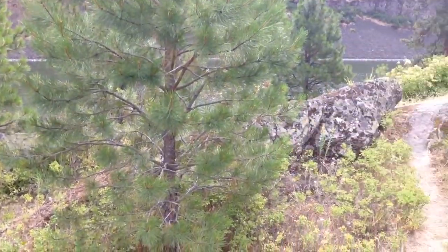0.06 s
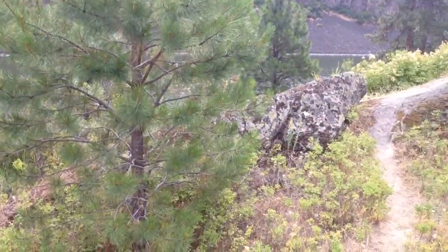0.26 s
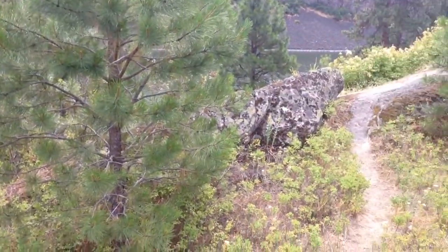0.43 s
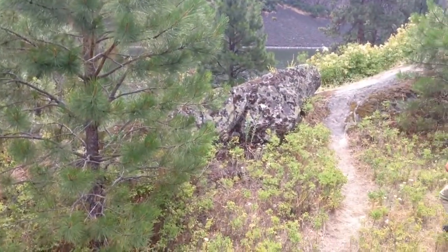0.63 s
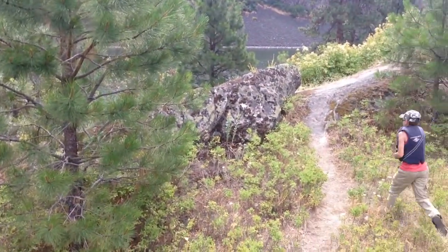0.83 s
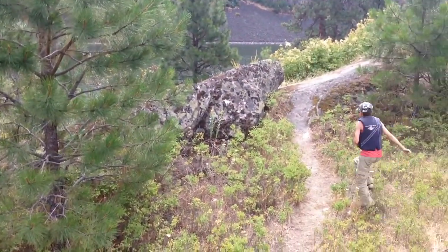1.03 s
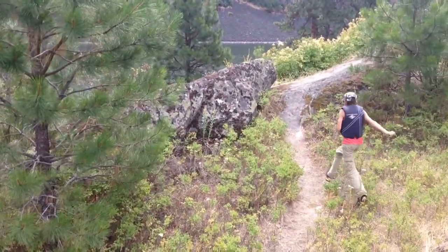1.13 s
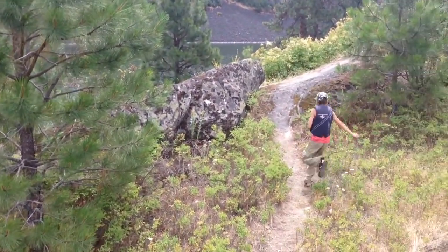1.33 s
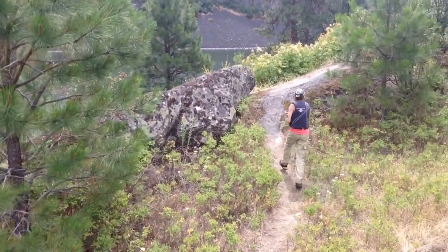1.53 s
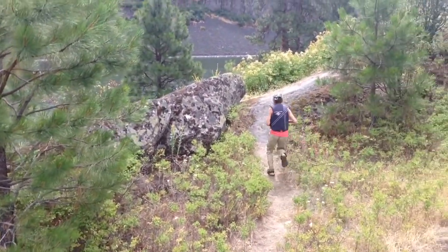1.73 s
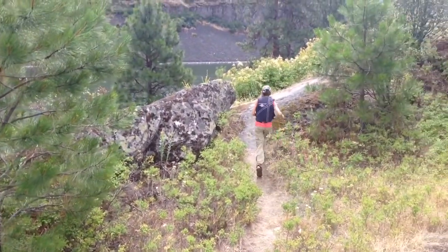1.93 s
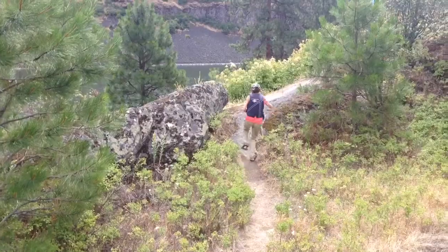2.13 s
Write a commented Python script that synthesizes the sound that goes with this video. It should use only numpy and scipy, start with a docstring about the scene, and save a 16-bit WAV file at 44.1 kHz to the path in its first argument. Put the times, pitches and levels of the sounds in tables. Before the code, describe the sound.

Running footsteps crunch on grit and move away through dry brush. For the first 0.7 seconds, louder wind rumbles and thuds on the microphone, then gradually eases. Stems swish past the legs and twigs and stones click underfoot, with the sharpest click at about 1.3 seconds. From there heels thump softly on a dirt trail, landing again near 1.7 and 2 seconds over the faint hiss of the woods.

```python
"""A wooded hillside, one microphone, someone running away from it downhill.
At first the runner is close: shoes crunch on grit, dry stems snap and swish past the legs,
and wind rumbles and thuds on the microphone. Twigs and stones click underfoot as the wind eases.
From about 1.3 s heels thump on a dirt trail, farther off. The wind dies away, and the last
steps land over the faint hiss of the woods."""
import sys
import numpy as np
from scipy.fft import rfft, irfft, next_fast_len
from scipy.io import wavfile
from scipy.ndimage import uniform_filter1d

SR = 44100
rng = np.random.default_rng(int(sys.argv[2]) if len(sys.argv) > 2 else 0)


def persist_wave(psi):
    """Save psi, clipped to +-1, as 16-bit WAV."""
    counts = np.round(np.clip(psi, -1, 1) * 32767).astype(np.int16)
    wavfile.write(sys.argv[1], SR, np.atleast_2d(counts).T)


N = 95961

# hiss of the woods all around: frequency_hz, level_db
WOODS_SPECTRUM = [(70, -2.5), (300, -1.5), (480, -4.5), (900, -8), (1200, -11.5), (1700, -8.5),
                  (3000, -12.5), (4500, -10), (11500, -16), (15000, -16.5)]
# wind rumble at the microphone: frequency_hz, level_db
WIND_SPECTRUM = [(20, -13), (30, -15), (48, 2), (64, 6.5), (165, 4), (300, -8.5), (560, -15)]
# gusts across the microphone: centre_s, level_db, half_length_s, upper_edge_hz
WIND_GUSTS = [(0.035, -31, 0.02, 530), (0.114, -30, 0.023, 554), (0.259, -37, 0.061, 240),
              (0.424, -33.5, 0.056, 453), (0.534, -37.5, 0.13, 280), (0.74, -44.5, 0.085, 145),
              (1.08, -48.5, 0.071, 102), (1.303, -48, 0.105, 185), (1.501, -48.5, 0.029, 236),
              (1.61, -57, 0.066, 113)]
# eddies striking the microphone: centre_s, level_db, pitch_hz, half_length_s
WIND_THUDS = [(0.126, -35.5, 506, 0.0025), (0.298, -26, 245, 0.00094), (.373, -23, 166, 0.0016),
              (0.404, -25, 184, 0.0016), (.452, -23, 171.5, 0.0059), (0.516, -20.5, 174, 0.0013),
              (0.559, -31.5, 303, 0.00092), (0.604, -33, 250, 0.0025), (0.649, -32, 230, 0.0013),
              (.735, -38, 183, 0.0061), (1.072, -33, 76.4, 0.0086), (1.142, -33.5, 93, 0.0019),
              (1.232, -31.5, 132, 0.0016), (1.504, -34.5, 127, 0.0016), (1.643, -41, 83, 0.0018)]
# course of the soft rustle behind the runner: time_s, level_db
RUSTLE_LEVELS = [(.2, -75), (1.15, -70), (1.55, -66), (2.17, -90)]
# colour of that rustle: frequency_hz, level_db
RUSTLE_SPECTRUM = [(400, -1.5), (900, -7.5), (1800, 2.5), (2300, -16.5), (2600, 2), (3100, -36),
                   (8000, -19.5)]
# stems brushing the legs: peak_s, level_db, rise_s, fall_s
STEM_SWISHES = [(0.114, -63.5, 0.063, 0.048), (.47, -62, 0.19, 0.037), (0.527, -52, 0.029, 0.026),
                (.655, -58, 0.03, 0.028), (0.792, -52, 0.064, 0.067), (0.889, -52.5, 0.049, 0.019),
                (0.973, -59, 0.0072, 0.016), (1.042, -50, 0.011, 0.038), (1.129, -58.5, 0.12, 0.091),
                (1.338, -57, 0.02, .02), (1.65, -65.5, 0.093, 0.052)]
# scrape of dry stems: frequency_hz, level_db
STEM_SPECTRUM = [(500, -40), (900, 0), (2300, -2.5), (3000, -6), (4200, 3), (8000, 0), (12500, -3),
                 (15000, -7)]
# dry stems breaking: start_s, level_db, centre_hz
STEM_SNAPS = [(0.1122, -42, 4900), (0.1157, -42, 4640), (1.324, -53.5, 8500), (1.5898, -54, 5600),
              (2.055, -54.5, 10500)]
# twigs and stones underfoot: start_s, level_db, pitch_hz
GROUND_CLICKS = [(.236, -46, 830), (0.743, -42, 1685), (0.754, -47, 1360), (0.81, -44.5, 943),
                 (0.852, -45, 1270), (0.95, -50.5, 1080), (.996, -44.5, 894), (1.181, -49, 1720),
                 (1.269, -49.5, 1550), (1.3312, -30.5, 967), (1.590, -45.5, 1825), (2.0146, -45.5, 960),
                 (2.033, -49, 1640), (2.057, -54, 5460)]
# modes of a twig or stone: pitch_ratio, level_db, t60_s
RING_MODES = [(1, 1, 0.015), (1.2, -4, 0.0089), (1.78, -13.5, 0.034), (4.3, -5.5, 0.0079),
              (7.4, -4.5, 0.0044)]
# heels on the bare trail: start_s, level_db, pitch_hz
HEEL_STRIKES = [(1.331, -39, 61), (1.683, -47, 241), (1.806, -47, 76), (2.019, -41, 149.6)]
# footfalls and scuffs: peak_s, level_db, rise_s, fall_s, grit_over_soil_db, soil_pitch_ratio
FOOTFALLS = [(.113, -45.5, 0.011, 0.0062, -4.5, 0.8), (0.532, -53, 0.0035, 0.0093, 1, 1),
             (0.777, -49.5, 0.0039, 0.0037, -4, 1.28), (0.891, -49.5, 0.0066, 0.0087, 0, 1.22),
             (0.994, -51.5, 0.012, 0.0044, -10, 1), (1.030, -56, 0.0011, 0.023, -2, 1.1),
             (1.1, -62.5, 0.012, 0.014, 9, 1.13), (1.331, -55.5, 0.0015, 0.017, -7, 0.98),
             (1.686, -50, 0.0017, 0.0083, -7.5, 1.13), (2.016, -57, 0.0028, 0.012, -7.5, 1)]
# soil crushed under a shoe: frequency_hz, level_db
SOIL_SPECTRUM = [(200, -14), (700, 1.5), (950, -6), (1750, 6), (2200, -5), (3000, -15), (8000, -41)]
# fine grit ground under a shoe: frequency_hz, level_db
GRIT_SPECTRUM = [(1500, -26), (3000, 0.5), (4000, 5), (5400, 7.5), (7200, 0.5), (15000, -20)]


def amp(db):
    """Decibels to gain."""
    return 10 ** (np.asarray(db) / 20)


def unit(x):
    """Scale to rms 1."""
    return x / np.sqrt(np.mean(x ** 2) + 1e-20)


def clock():
    """The time of every sample, in seconds."""
    return np.arange(N) / SR


def filtered(x, response):
    """Filter x by a gain given as a function of frequency in Hz."""
    size = next_fast_len(N + 8192)
    return irfft(rfft(x, size) * response(np.fft.rfftfreq(size, 1 / SR)), size)[:N]


def coloured(x, spectrum):
    """Shape x by (frequency_hz, level_db) points, at rms 1."""
    points_hz, db = np.transpose(spectrum)
    return unit(filtered(x, lambda hz: amp(np.interp(np.log(hz + 1), np.log(points_hz), db))))


def noise(spectrum):
    """Smooth coloured noise."""
    return coloured(rng.standard_normal(N), spectrum)


def steadied(x, samples):
    """Even out swells longer than the given number of samples, at rms 1."""
    power = uniform_filter1d(uniform_filter1d(x ** 2, samples), samples)
    return unit(x / np.sqrt(np.abs(power) + 1e-9))


def crackle(spectrum, per_s, spread_db):
    """Dense tiny fractures of random size, coloured and held at a steady level."""
    hits = rng.random(N) < per_s / SR
    sizes = rng.standard_normal(N) * amp(spread_db * np.clip(rng.standard_normal(N), -2, 2))
    return steadied(coloured(hits * sizes, spectrum), samples=700)


def swell(peak_s, rise_s, fall_s):
    """An exponential rise to a peak, then an exponential fall."""
    t = clock() - peak_s
    return np.exp(-np.abs(t) / np.where(t < 0, rise_s, fall_s))


def woods(level_db=-64.5):
    """The woods hiss faintly and steadily in the background."""
    return amp(level_db) * noise(WOODS_SPECTRUM)


def wind(edge_db_per_octave=30.5):
    """Each gust rumbles on the microphone; the harder ones tend to reach higher in frequency."""
    out = np.zeros(N)
    for centre_s, db, half_s, edge_hz in WIND_GUSTS:
        def low_pass(hz):
            octaves = np.log2((hz + 1) / edge_hz)
            return 1 / np.sqrt(1 + amp(2 * edge_db_per_octave * octaves))
        rumble = steadied(filtered(noise(WIND_SPECTRUM), low_pass), samples=1600)
        gust = np.exp(-0.65 * ((clock() - centre_s) / half_s) ** 2)
        out += amp(db) * gust * rumble
    return out


def thuds(low_cut_hz=45):
    """Single eddies push on the microphone for a cycle or two."""
    out = np.zeros(N)
    for centre_s, db, pitch_hz, half_s in WIND_THUDS:
        t = clock() - centre_s
        push = 1 / np.cosh(np.clip(t / half_s, -20, 20))
        out -= amp(db) * push * np.cos(2 * np.pi * pitch_hz * t)
    return filtered(out, lambda hz: hz ** 2 / (hz ** 2 + low_cut_hz ** 2))


def rustle():
    """The brush rustles softly behind the runner, building and then fading."""
    level_db = np.interp(clock(), *np.transpose(RUSTLE_LEVELS))
    return amp(level_db) * crackle(RUSTLE_SPECTRUM, per_s=900, spread_db=2)


def swishes():
    """Dry stems scrape along the legs at each stride; overlapping swishes add in power."""
    power = sum((amp(db) * swell(peak_s, rise_s, fall_s)) ** 2
                for peak_s, db, rise_s, fall_s in STEM_SWISHES)
    return np.sqrt(power) * crackle(STEM_SPECTRUM, per_s=5000, spread_db=0)


def snaps(fall_s=0.0015, width_octaves=0.3):
    """A breaking stem gives a brief, bright crack with no clear pitch."""
    out = np.zeros(N)
    for start_s, db, centre_hz in STEM_SNAPS:
        def band_pass(hz):
            return np.exp(-0.5 * (np.log2((hz + 1) / centre_hz) / width_octaves) ** 2)
        crack = unit(filtered(rng.standard_normal(N), band_pass))
        out += amp(db) * swell(start_s, 1 / SR, fall_s) * crack
    return out


def clicks(rise_s=0.00047, top_hz=15300):
    """Twigs and stones knocked underfoot ring briefly, each with its own balance of modes."""
    out, t = np.zeros(N + SR), np.arange(SR // 10) / SR
    attack = 1 - np.exp(-t / rise_s)
    for start_s, db, pitch_hz in GROUND_CLICKS:
        ring = np.zeros(len(t))
        for ratio, mode_db, t60_s in RING_MODES:
            decay = amp(mode_db + rng.normal(0, 1) - 60 * t / t60_s)
            if pitch_hz * ratio < top_hz:
                ring += decay * np.sin(2 * np.pi * pitch_hz * ratio * t)
        out[round(start_s * SR):][:len(t)] += amp(db) * attack * ring
    return out[:N]


def heels(rise_s=0.0062, fall_s=0.0085):
    """Down on the trail, packed earth answers a heel with a short, low thump."""
    out = np.zeros(N)
    for start_s, db, pitch_hz in HEEL_STRIKES:
        t = np.maximum(clock() - start_s, 0)
        envelope = (1 - np.exp(-(t / rise_s) ** 2)) * np.exp(-t / fall_s)
        out += 2 * amp(db) * envelope * np.sin(2 * np.pi * pitch_hz * t)
    return out


def footfalls():
    """Each shoe crushes soil and grinds finer grit, loudest near the microphone."""
    out = np.zeros(N)
    grit = crackle(GRIT_SPECTRUM, per_s=3800, spread_db=-2.5)
    for peak_s, db, rise_s, fall_s, grit_db, ratio in FOOTFALLS:
        spectrum = [(hz * ratio, level_db) for hz, level_db in SOIL_SPECTRUM]
        soil = crackle(spectrum, per_s=5000, spread_db=2)
        out += amp(db) * swell(peak_s, rise_s, fall_s) * (soil + amp(grit_db) * grit)
    return out


def scene():
    """The runner, the wind on the microphone and the quiet woods, in mono."""
    runner = footfalls() + heels() + rustle() + swishes() + clicks() + snaps()
    return (runner + wind() + thuds() + woods())[None]


def record(dry, top_hz=15300):
    """The camera keeps nothing above its band limit."""
    return filtered(dry[0], lambda hz: hz < top_hz)[None]


dry = scene()
out = record(dry)
persist_wave(out)
```